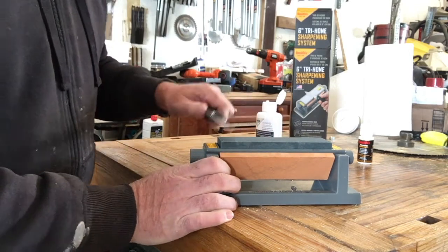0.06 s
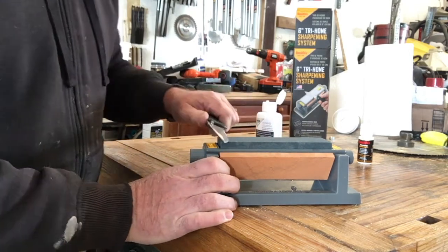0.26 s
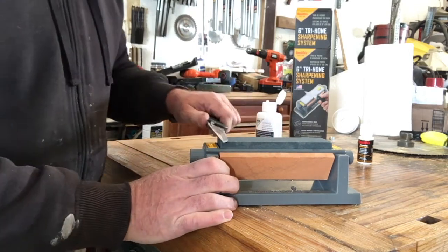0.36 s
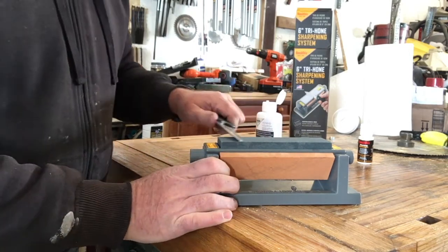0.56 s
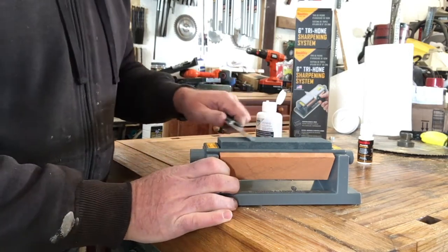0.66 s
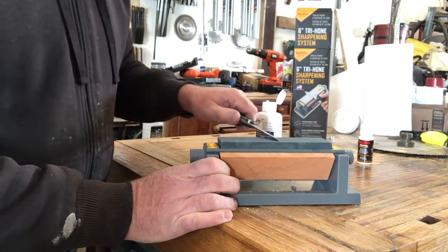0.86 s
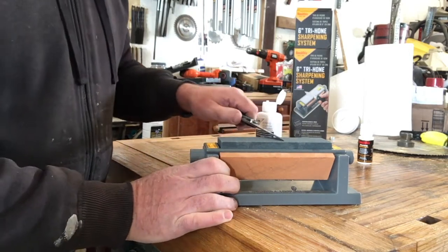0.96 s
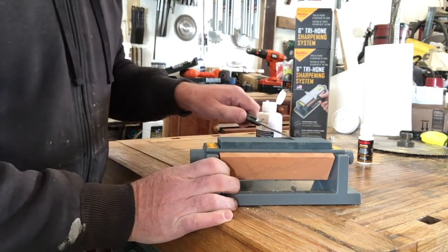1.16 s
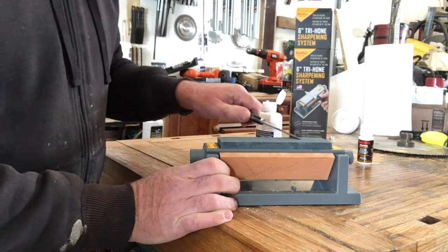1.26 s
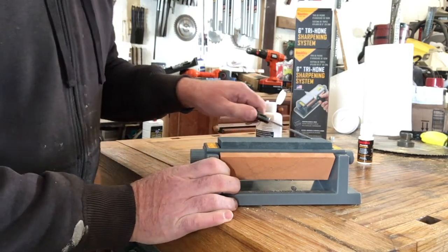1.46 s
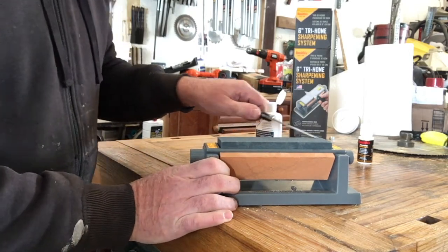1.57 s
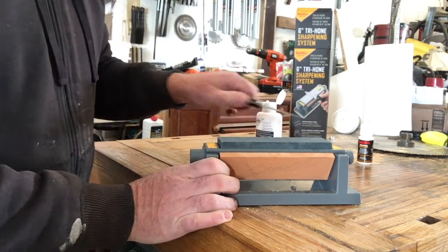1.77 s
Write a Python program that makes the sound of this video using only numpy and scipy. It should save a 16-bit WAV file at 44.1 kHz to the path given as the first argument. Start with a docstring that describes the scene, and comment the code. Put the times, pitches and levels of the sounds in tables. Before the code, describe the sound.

A steel knife scrapes once across a sharpening stone, close by in a small, quiet workshop. The blade lands with a light clack at 0.2 seconds. A gritty, hissing rasp starts at 0.4, eases near 1 second, then bites again with a tick. The stone's holder knocks softly around 1.4. At 1.6 seconds the scrape ends and the blade lifts with a faint ring.

```python
"""Sharpening a knife

A steel knife is set down on an oiled stone in a small workshop and drawn across it once, heel to tip.
Grit catches the edge thousands of times a second: it hisses and makes the steel rasp and ring low.
The edge eases off midway, bites on the curved belly and the tip, then lifts; the holder knocks softly."""
import sys
import numpy as np
from scipy import signal
from scipy.fft import rfft, irfft
from scipy.io import wavfile

SR = 44100
rng = np.random.default_rng(int(sys.argv[2]) if len(sys.argv) > 2 else 0)


def dump(signal):
    """Clip the signal to [-1, 1] and save it as 16-bit WAV at the path in sys.argv[1]."""
    limited = np.clip(np.atleast_2d(signal).T, -1, 1)
    pcm = np.round(limited * 32767).astype(np.int16)
    wavfile.write(sys.argv[1], SR, pcm)


N = 79380
T = np.arange(N) / SR
HZ = np.fft.rfftfreq(2 * N, 1 / SR)

# the low notes at which the blade rings: pitch_hz, width_hz, relative_db
LOW_RINGS = [(946, 79, -6), (1039, 100, 0.5), (1141, 33, 2.5), (1216, 127, -5)]


def amp(db):
    """Turns decibels into a gain."""
    return 10 ** (np.asarray(db) / 20)


def unit(x):
    """Scales a signal to an average (rms) level of 1."""
    return x / np.sqrt(np.mean(x ** 2) + 1e-20)


def curve_at(points, hz):
    """Joins (pitch, value) points along a log pitch axis and reads the values at hz."""
    pitches, values = np.transpose(points)
    return np.interp(np.log(hz + 1), np.log(np.sort(pitches) + 1), values)


def shaped(x, gains):
    """Gives each frequency its own gain, then scales to level 1."""
    return unit(irfft(rfft(x, 2 * N) * gains)[:N])


def noise(colour):
    """Steady noise; its colour says how strong each pitch is."""
    return shaped(rng.standard_normal(N), amp(curve_at(colour, HZ)))


def ring(x, notes, steepness):
    """Lets x shake an object that rings at certain notes; more steepness lets less through between them."""
    power = sum(amp(db) ** 2 / (1 + (2 * (HZ - hz) / width) ** 2) ** steepness for hz, width, db in notes)
    log_gain = np.log(power + 1e-10) / 2
    # this phase makes the ringing follow the push that causes it
    phase = -signal.hilbert(np.r_[log_gain, log_gain[-2:0:-1]]).imag[:N + 1]
    return shaped(x, np.exp(log_gain + 1j * phase))


def blow(start_s, rise_s, fade_s):
    """The loudness of a hit: a straight rise, then a drop of 60 dB every fade_s."""
    rise = np.clip((T - start_s) / rise_s, 0, 1)
    return rise * 1000 ** (-np.maximum(T - start_s - rise_s, 0) / fade_s)


def background():
    """Quiet room air and a wavering low hum."""
    # colour of the air: pitch_hz, relative_db
    air_colour = [(25, -31), (45, -4), (110, -8.5), (300, -18), (1500, -27), (5000, -37), (15500, -42.5)]
    # the room's hum: pitch_hz, width_hz, level_db
    hums = [(56.7, 19, -70.5), (87.1, 4.6, -73)]
    hum = sum(amp(db) * ring(rng.standard_normal(N), [(hz, width, 0)], steepness=2.4)
              for hz, width, db in hums)
    return amp(-69) * noise(air_colour) + hum


def room_echo(x, gap_s=0.006):
    """Sound bounces off bench and walls in many echoes; the low ones last longest."""
    # how long the echoes take to drop 60 dB: pitch_hz, fade_s
    fades = [(200, 0.89), (1300, 0.3), (3500, 0.35), (9000, 0.31)]
    echoes = rng.standard_normal(SR) * (rng.random(SR) < .1) * (T[:SR] > gap_s)
    hz, seconds, bands = signal.stft(echoes, SR, nperseg=256)
    fading = 1000 ** (-seconds / curve_at(fades, hz)[:, None])
    tail = signal.istft(bands * fading, SR, nperseg=256)[1]
    return signal.fftconvolve(x, tail / np.linalg.norm(tail))[:N]


def holder():
    """The stone's holder hums while the blade bears down, and knocks as it shifts on the wooden bench."""
    # the holder's hum: start_s, end_s, pitch_hz, width_hz, level_db
    holder_hum = (0.53, 1.05, 386, 48, -71.5)
    # knocks on the bench: start_s, level_db, rise_s, fade_s
    knocks = [(1.015, -62.5, 0.0038, 0.029), (1.379, -52, 0.017, 0.076), (1.69, -57, 0.0021, 0.021)]
    # dull colour of a knock: pitch_hz, relative_db
    knock_colour = [(80, -35), (250, -3.5), (500, -1.5), (800, 0.5), (1300, -4.5), (12000, -66)]
    start, end, hz, width, hum_db = holder_hum
    progress = np.clip((T - start) / (end - start), 0, 1)
    pressure = np.sqrt(np.maximum(np.sin(np.pi * progress), 0))
    hum = amp(hum_db) * pressure * ring(rng.standard_normal(N), [(hz, width, 0)], steepness=1.6)
    return hum + sum(amp(db) * noise(knock_colour) * blow(s, rise, fade) for s, db, rise, fade in knocks)


def free_blade():
    """The steel rings faintly when not pressed down: dull after it lands, bright as the tip leaves."""
    # notes of the free blade: pitch_hz, width_hz, relative_db
    notes = [(1023, 66, 9), (1612, 30, 15), (1980, 25, 13), (2560, 1500, 3), (3950, 190, -5),
             (6200, 300, 1), (6540, 92, -1.5), (8540, 400, -1)]
    # each time it rings on: start_s, level_db, fade_s, muffled_above_hz
    spells = [(0.216, -56, 0.62, 4450), (1.6, -64.5, 1.6, 14100)]
    out = np.zeros(N)
    for start, db, fade, top_hz in spells:
        ringing = ring(rng.standard_normal(N), notes, steepness=1)
        muffled = shaped(ringing, 1 / (1 + (HZ / top_hz) ** 4))
        out += amp(db) * blow(start, 0.0055, fade) * muffled
    return out


def touches():
    """The edge lands or skips on the stone: a short clack, a bright tick and a brief low ring."""
    # each touch: start_s, clack_db, tick_db, low_ring_db
    hits = [(0.2142, -38.5, -56, -60), (0.3102, -57, -58.5, -62), (1.047, -46, -58, -56),
            (0.931, -59, -66, -43.5), (1.0140, -62, -62, -43)]
    # notes of the blade against the stone: pitch_hz, relative_db
    clack_notes = [(860, -10), (1030, -8), (1880, -6.5), (2240, -4.5), (2480, -3.5), (2850, -15),
                   (3230, -5), (3940, -6), (4280, -11.5)]
    # colour of the tick: pitch_hz, relative_db
    tick_colour = [(1000, 0.5), (4800, -0.5), (6000, 9), (6800, 1.5), (9800, -1), (15500, -19)]
    low_hz = LOW_RINGS[1][0]
    out = np.zeros(N)
    for start, clack_db, tick_db, low_db in hits:
        age = T - start
        low_ring = unit(np.sin(2 * np.pi * low_hz * age))
        clack = sum(amp(db) * np.sin(2 * np.pi * (hz * age + rng.random())) for hz, db in clack_notes)
        out += amp(clack_db) * unit(clack) * blow(start, rise_s=0.0011, fade_s=0.03)
        out += amp(tick_db) * noise(tick_colour) * blow(start, rise_s=0.00073, fade_s=0.033)
        out += amp(low_db) * low_ring * blow(start, rise_s=0.0025, fade_s=0.05)
    return out


def grit(grains_per_s=9000, spread_db=2.5):
    """Single grains catch the edge sharply, over smooth rubbing; coarse ones snag it briefly."""
    # snags on coarse grit: start_s, boost_db
    snags = [(0.465, 6), (0.705, 6), (0.881, 9.5), (1.076, 5), (1.238, 10.5), (1.415, 11.5), (1.464, 6)]
    sizes = amp(spread_db * np.minimum(rng.exponential(1, N), 4))
    catches = sizes * rng.choice([-1., 1.], N) * (rng.random(N) < grains_per_s / SR)
    rubbing = 0.78 * rng.standard_normal(N)
    boost_db = sum(db * blow(start, rise_s=0.0026, fade_s=0.032) for start, db in snags)
    return (unit(catches) + rubbing) * amp(boost_db)


def judder(slow_hz=26.7, fast_hz=131):
    """The quick, uneven chatter of the edge on the stone."""
    return shaped(rng.standard_normal(N), (HZ > slow_hz) / (1 + (HZ / fast_hz) ** 2))


def scrape(stroke, hiss_colour, rasp_notes, offsets_db, start_s, end_s):
    """The same grit drives a hiss, a rasp and a low ring; offsets_db adds to their levels, in that order."""
    bite_s, lift_s = 0.0018, 0.0039
    steel_chatter_db, hiss_chatter_db = 1.24, 1.4
    times, *levels_db = np.transpose(stroke)
    hiss_gain, rasp_gain, low_gain = (amp(np.interp(T, times, db) + offset)
                                      for db, offset in zip(levels_db, offsets_db))
    contact = np.clip((T - start_s) / bite_s, 0, 1) * np.clip((end_s - T) / lift_s + 1, 0, 1)
    grains, chatter = grit(), judder()
    shaking = grains * amp(steel_chatter_db * chatter)
    hiss = shaped(grains * amp(hiss_chatter_db * chatter), amp(curve_at(hiss_colour, HZ)))
    rasp = ring(shaking, rasp_notes, steepness=0.97)
    low_ring = ring(shaking, LOW_RINGS, steepness=2.17)
    return contact * (hiss_gain * hiss + rasp_gain * rasp + low_gain * low_ring)


def heel_scrape():
    """The heel, the part of the edge by the handle, grinds over the stone and eases off."""
    # strength of the scrape, before the offsets: time_s, hiss_db, rasp_db, low_ring_db
    stroke = [(0.412, -57.5, -56, -57.5), (0.47, -53, -51.5, -50), (0.55, -59.5, -52.5, -58),
              (0.63, -55, -48.5, -73.5), (0.71, -54, -46.5, -52.5), (0.809, -51, -45.5, -50),
              (0.842, -61, -60, -63), (0.909, -54.5, -52, -53), (0.98, -66.5, -61, -58),
              (1.04, -76.5, -69, -87)]
    # colour of the grit at the heel: pitch_hz, relative_db
    hiss_colour = [(250, -33), (800, 4), (3500, 8.5), (4200, 9.5), (4800, 0.5), (6200, 5), (7500, -1),
                   (9200, 4.5), (10500, -7.5), (12900, -2), (14000, -8), (15500, -7.5)]
    # notes of the steel at the heel: pitch_hz, width_hz, relative_db
    rasp_notes = [(760, 96, -15.5), (1627, 43, 6.5), (1928, 65, 7.5), (2305, 97, 7.5), (2552, 60, 8.5),
                  (3004, 246, -3), (4170, 27, -2.5)]
    return scrape(stroke, hiss_colour, rasp_notes, offsets_db=(3.0, 2.0, -1.0), start_s=0.408, end_s=1.04)


def belly_and_tip_scrape():
    """The curved belly of the edge bites into the stone, then the tip; both have the same colour."""
    # strength of each scrape, before the offsets: time_s, hiss_db, rasp_db, low_ring_db
    belly_stroke = [(1.05, -52, -49, -53.5), (1.13, -56.5, -48.5, -49.5), (1.18, -61, -52, -47),
                    (1.235, -56.5, -53, -51.5), (1.351, -59, -51.5, -45.5), (1.4, -64, -62, -50.5),
                    (1.45, -65.5, -55, -56), (1.478, -58, -59, -47)]
    tip_stroke = [(1.494, -51, -46.5, -50), (1.563, -55.5, -51, -45.5), (1.615, -74, -54.5, -64)]
    # colour of the grit here: pitch_hz, relative_db
    hiss_colour = [(150, -1), (380, -0.5), (5300, 5.5), (6100, -1.5), (7300, 9.5), (7900, 3), (8400, 8.5),
                   (9300, -2), (10500, -1.5), (11200, 10), (11900, 2), (12700, -5), (15500, -1.5)]
    # notes of the steel here: pitch_hz, width_hz, relative_db
    rasp_notes = [(1579, 24, 8), (2002, 140, 2), (2517, 230, 4), (2940, 160, -0.5), (4350, 500, -11.5)]
    offsets_db = (0.14, -3.5, -0.95)
    belly = scrape(belly_stroke, hiss_colour, rasp_notes, offsets_db, start_s=1.046, end_s=1.483)
    tip = scrape(tip_stroke, hiss_colour, rasp_notes, offsets_db, start_s=1.491, end_s=1.62)
    return belly + tip


def scene():
    """The whole stroke at the bench, with the workshop's echo and background."""
    near = heel_scrape() + belly_and_tip_scrape() + touches() + free_blade() + holder()
    return (near + amp(-5) * room_echo(near) + background())[None]


def record(dry):
    """Cuts away the very highest treble."""
    top_hz = 15730
    low_pass = signal.firwin(511, top_hz, window=("kaiser", 9), fs=SR)
    return signal.oaconvolve(dry, low_pass[None], "same")


dry = scene()
out = record(dry)
dump(out)
```